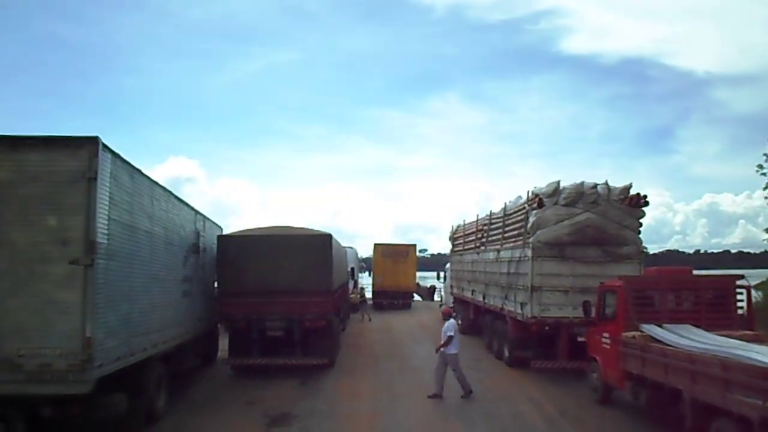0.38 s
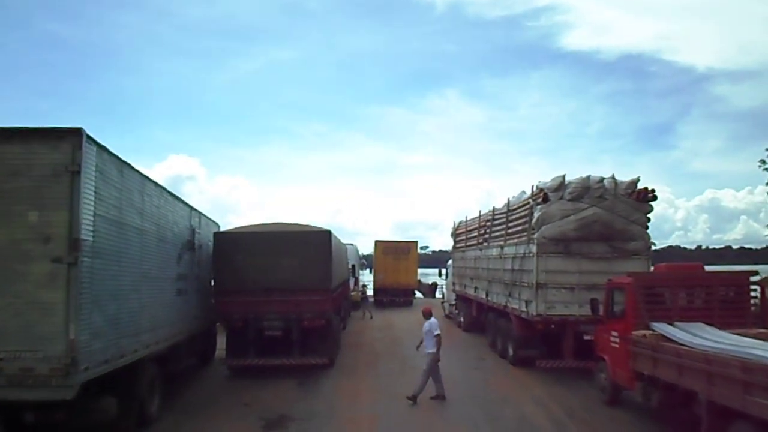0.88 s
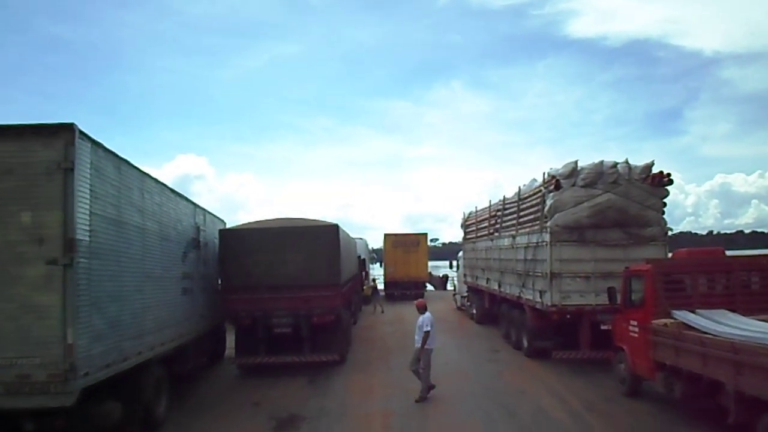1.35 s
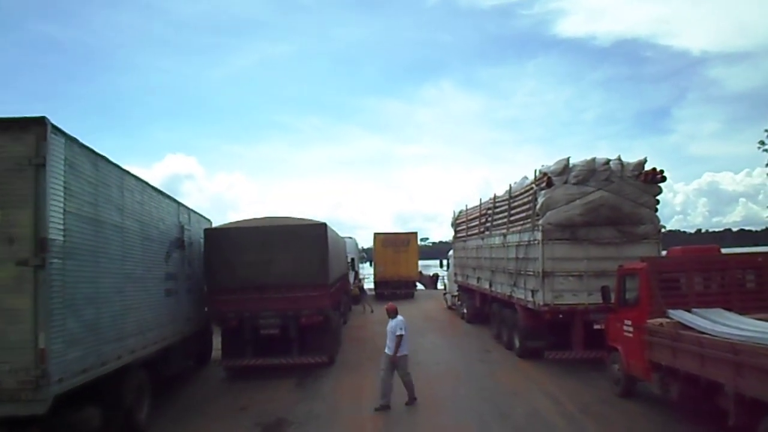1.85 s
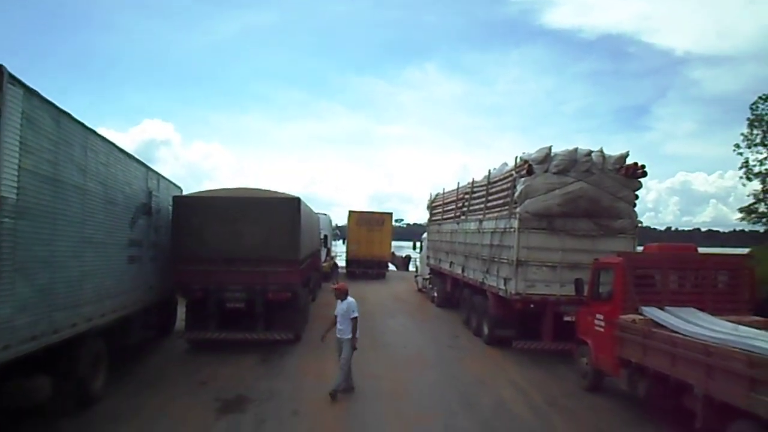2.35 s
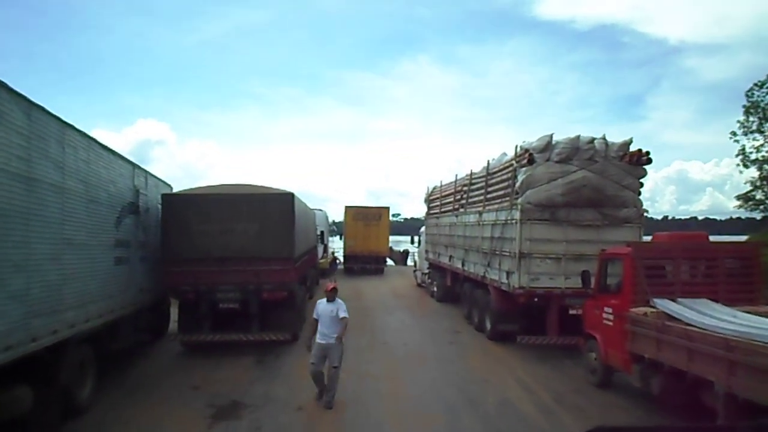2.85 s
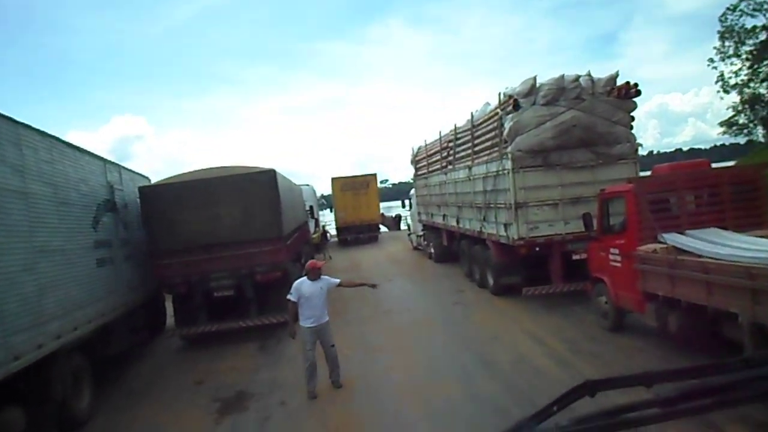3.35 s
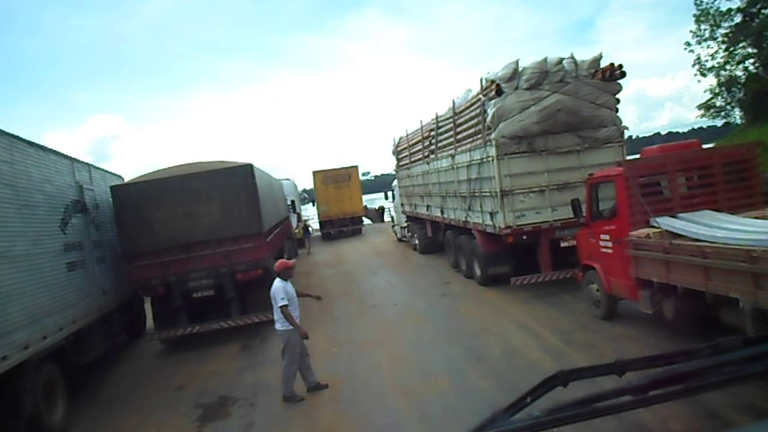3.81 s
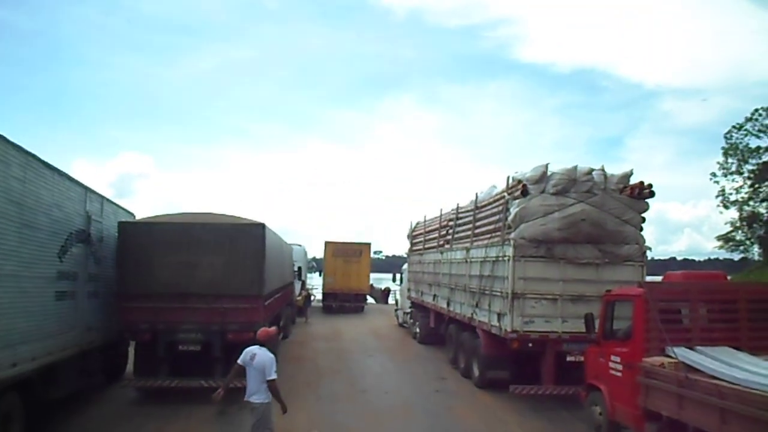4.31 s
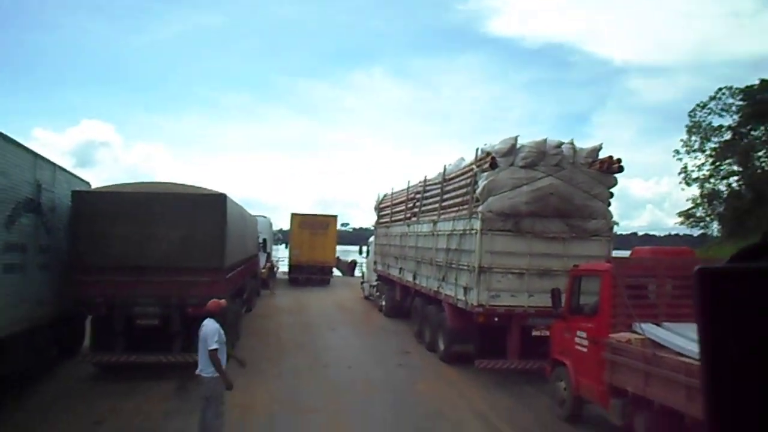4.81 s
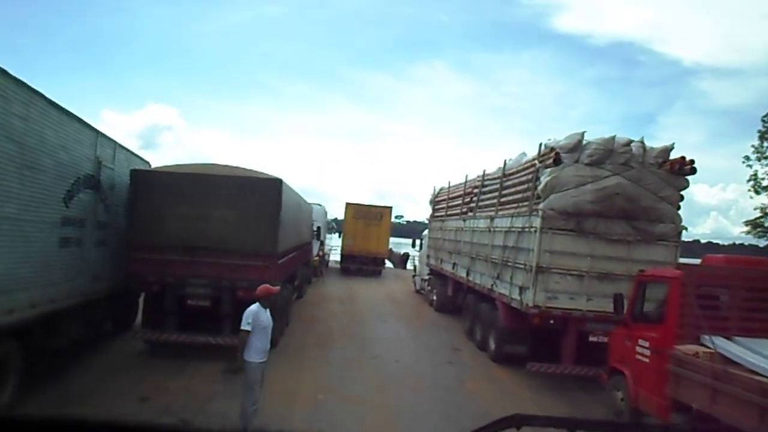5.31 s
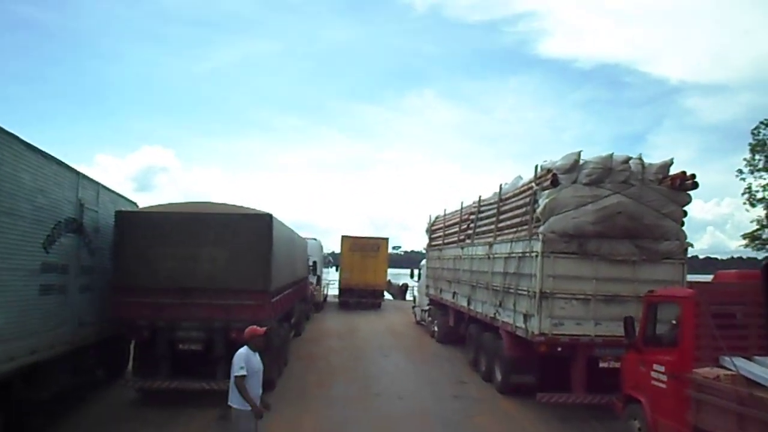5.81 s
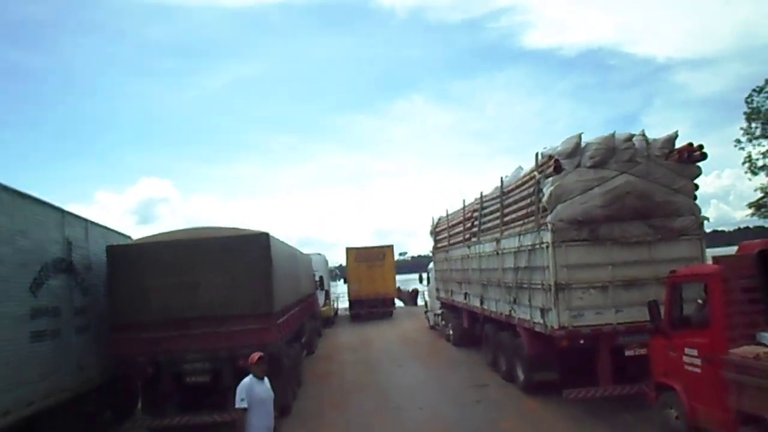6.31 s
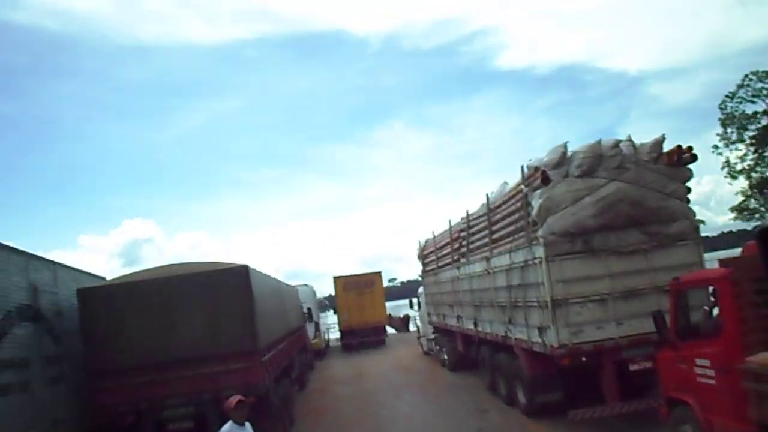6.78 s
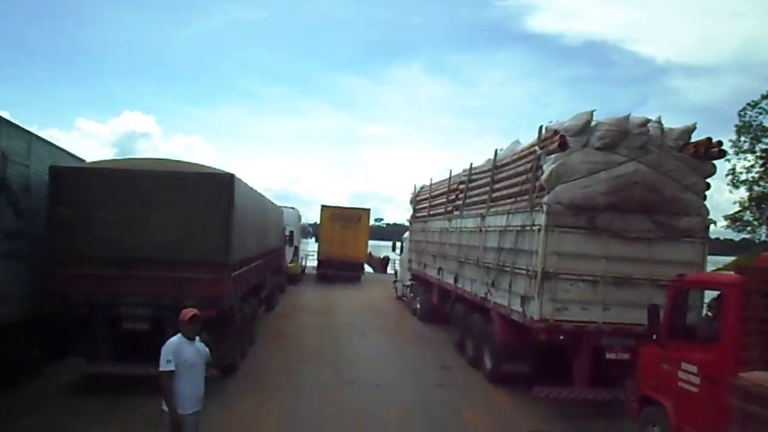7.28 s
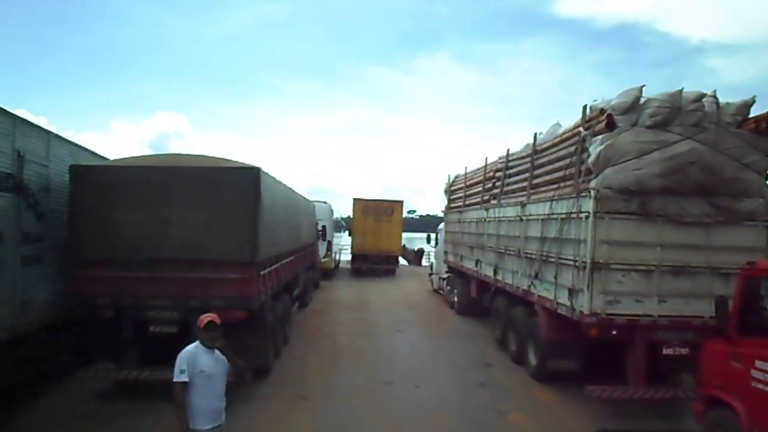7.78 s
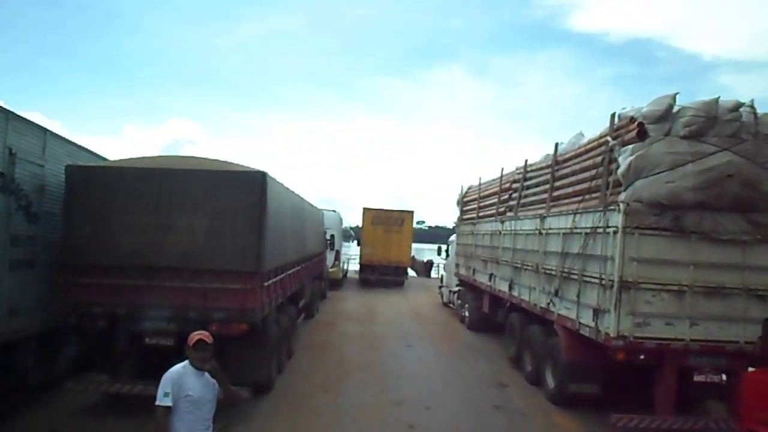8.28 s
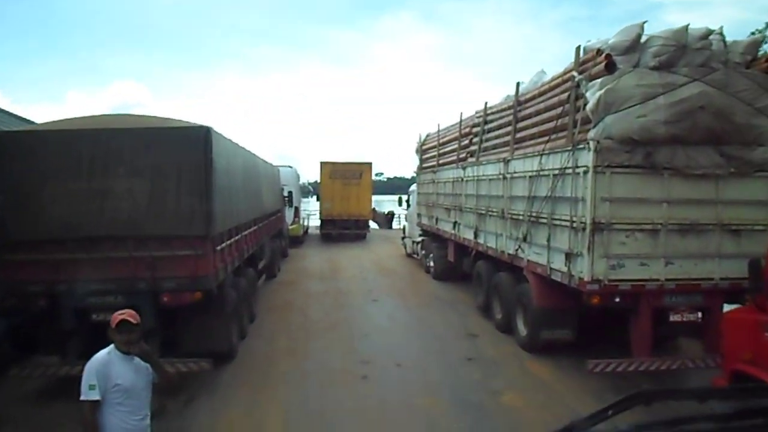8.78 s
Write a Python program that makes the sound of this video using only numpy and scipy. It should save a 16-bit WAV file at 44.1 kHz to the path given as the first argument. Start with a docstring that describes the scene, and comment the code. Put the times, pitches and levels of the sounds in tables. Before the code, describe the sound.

Heard from the driver's seat, a big diesel runs near idle, booming deeply with knock, clatter and a faint whine over rumble and soft air hiss. Faint squeaks lead to two quick, muffled brake-air puffs before three seconds. Later, scattered plastic ticks snap near the microphone, a dull bump lands, and a cluster of thumps shakes it near eight seconds, followed by one last tick and squeak.

```python
"""Inside a truck cab in a queue: a six-cylinder diesel near idle booms, knocks, whines and clatters throughout,
as tones and filtered noise tied to its firings, over rumble, air hiss and a neighbour's engine in steady tones.
Early on faint squeaks sound (narrow gliding noise), then the air brake puffs twice (noise in duct resonances).
From the middle on a plastic part near the microphone ticks now and then (short damped sines), and dull bumps
shake it (low noise bursts with ringing modes); one last squeak comes near the end."""
import sys
import numpy as np
from scipy import signal
from scipy.fft import rfft, irfft
from scipy.io import wavfile

SR = 44100
rng = np.random.default_rng(int(sys.argv[2]) if len(sys.argv) > 2 else 0)


def file_out(sig):
    """Save sig as 16-bit WAV at sys.argv[1]."""
    # one column per channel
    cols = np.atleast_2d(sig).T
    # limit, then scale
    lim = np.clip(cols, -1, 1)
    pcm = np.round(lim * 32767).astype(np.int16)
    wavfile.write(sys.argv[1], SR, pcm)


def gain_from_db(level_db):
    """Turn a decibel level (scalar or array-like) into a linear amplitude factor."""
    decades = np.asarray(level_db, float) / 20
    return 10 ** decades


N = 392049

# Engine load. Each row: time in seconds, clatter in dB, air hiss from outside in dB.
LOAD = [(0, -42, -50), (.5, -40.5, -51), (1.1, -38, -50), (2, -38.5, -50.5), (2.75, -38, -51),
        (3.44, -42, -54), (4.1, -40, -53), (4.3, -39.5, -49.5), (4.8, -38.5, -50), (5.37, -36.5, -50),
        (5.47, -40.5, -51.5), (6.1, -41, -52.5), (7.1, -40.5, -52), (7.5, -38, -48), (7.95, -36, -49),
        (8.15, -37, -48), (8.4, -33.5, -47), (8.89, -35.5, -44)]


def evened(x):
    """Scales to rms 1."""
    return x / np.sqrt(np.mean(x ** 2) + 1e-20)


def columns(rows, t):
    """Every column of a curve table, interpolated at the times t."""
    times_s, *rest = np.transpose(rows)
    return [np.interp(t, times_s, column) for column in rest]


def add(mix, start_s, sound):
    """Mixes a sound in at start_s."""
    part = mix[round(start_s * SR):][:len(sound)]
    part += sound[:len(part)]


def resonate(x, hz, width_hz):
    """One-pole resonance of gain 1: shifts hz (may glide) down to zero, smooths, shifts back."""
    turn = np.exp(2j * np.pi * np.cumsum(hz * np.ones(len(x))) / SR)
    pole = np.exp(-np.pi * width_hz / SR)
    smooth = signal.lfilter([1 - pole], [1, -pole], x / turn)
    return 2 * (turn * smooth).real


def ring(x, hz, width_hz):
    """Steep resonance: two equal stages of width_hz each, rms 1."""
    return evened(resonate(resonate(x, hz, width_hz), hz, width_hz))


def coloured(x, points):
    """Multiplies the spectrum of x by a curve of (Hz, dB) points, rms 1."""
    point_hz, point_db = np.transpose(points)
    hz = np.fft.rfftfreq(len(x), 1 / SR)
    curve_db = np.interp(np.log(hz + 1), np.log(point_hz + 1), point_db)
    return evened(irfft(rfft(x) * gain_from_db(curve_db), len(x)))


def drift(per_s):
    """Slow chance: per_s random points a second, smoothly joined, rms 1."""
    points = rng.standard_normal(int(N / SR * per_s) + 2)
    return evened(signal.resample(points, N))


def loaded(t, idle_db, load_share, pull_share, waver_db, per_s):
    """Level in dB that follows shares of the engine load and driveline pull, and wavers by chance."""
    # How hard the driveline pulls while creeping. Each row: time in seconds, pull in dB.
    pull = [(0, -1.5), (.3, -5.5), (.75, 3), (1.15, -0.5), (1.9, 0), (2.1, -4), (2.5, 4.5), (2.9, -0.5),
            (3.4, -11), (3.65, 5.5), (3.9, -4.5), (4.7, 3), (5.3, 4.5), (5.8, -5.5), (6.05, -7),
            (6.3, -6.5), (6.6, -4.5), (7.1, -6), (7.35, 2), (7.9, 8), (8.3, 2), (8.89, -4)]
    light_load_db = -40
    load_db = columns(LOAD, t)[0] - light_load_db
    pull_db = columns(pull, t)[0]
    return idle_db + load_share * load_db + pull_share * pull_db + waver_db * drift(per_s)


def rumble(t):
    """Low broadband noise that follows the engine load."""
    # Rumble spectrum. Each row: frequency in Hz, relative density in dB per Hz.
    spectrum = [(4, -21), (9, 4.5), (22, 10.5), (44, 2.5), (72, 6.5), (100, 3.5), (135, -2), (190, -5.5),
                (250, -6.5), (330, -15.5), (600, -28), (900, -69)]
    # Level: dB at light load, share of load, share of pull, wavering in dB rms.
    level = (-38.5, 0.85, -0.14, 0.8)
    noise = coloured(rng.standard_normal(N), spectrum)
    hz = np.fft.rfftfreq(N, 1 / SR)
    rms_above_95_hz = np.sqrt(2 * np.sum(abs(rfft(noise)[hz > 95]) ** 2)) / N
    return gain_from_db(loaded(t, *level, per_s=7.5)) * noise / rms_above_95_hz


def outside_hiss(t):
    """Air hiss from outside: coloured noise with a fast flutter in level."""
    # Hiss spectrum. Each row: frequency in Hz, relative density in dB per Hz.
    spectrum = [(1470, -5), (2500, -3.5), (3520, -6.5), (3860, -10.5), (5100, -10.5), (7470, -17),
                (8130, -17.5), (9870, -15.5), (11800, -35), (15300, -67), (22000, -120)]
    level_db = columns(LOAD, t)[1] + 1.02 * drift(per_s=40)
    return gain_from_db(level_db) * coloured(rng.standard_normal(N), spectrum)


def neighbour(t):
    """Engine alongside: tones of fixed pitch that swell and fade together."""
    # Drone tones. Each row: frequency in Hz, relative level in dB.
    tones = [(58.8, -9), (88.15, 0), (117.5, -14)]
    # Drone swell. Each row: time in seconds, gain in dB.
    swell = [(0, -44), (.35, -32), (.7, -32.5), (1.2, -32.5), (1.5, -44), (2, -31), (2.4, -36), (3, -32.5),
             (3.5, -36), (3.95, -33.5), (4.15, -27.5), (4.7, -32), (5.2, -28.5), (5.8, -29.5), (6, -41),
             (6.45, -45), (6.6, -27), (7, -32), (7.5, -38.5), (8.2, -33), (8.89, -35)]
    drone = sum(gain_from_db(db) * np.sqrt(2) * np.sin(2 * np.pi * hz * t) for hz, db in tones)
    return gain_from_db(columns(swell, t)[0]) * drone


def squeak(start_s, length_s, from_hz, to_hz, width_hz, level_db):
    """Faint, fuzzy metal whistle: noise in a narrow gliding resonance."""
    hz = np.linspace(from_hz, to_hz, round(length_s * SR))
    whistle = ring(rng.standard_normal(len(hz)), hz, width_hz)
    return start_s, gain_from_db(level_db) * whistle * signal.windows.tukey(len(hz), .5)


def puff(start_s, pipe_db, top_hz, hiss_db, rise_s, fall_s):
    """Escaping brake air: a pipe resonance sinks with the pressure through fixed duct modes; treble dies first."""
    # Treble hiss spectrum. Each row: frequency in Hz, relative density in dB per Hz.
    hiss_spectrum = [(1500, -26), (2600, 2), (4000, -2), (6000, -11), (9500, -13), (11000, -22),
                     (13000, -62)]
    # Brake duct resonances. Each row: frequency in Hz, width in Hz, gain in dB.
    duct = [(850, 120, -4), (1150, 90, -2), (1350, 110, 0), (1630, 80, 0), (1895, 70, -2), (2170, 80, -3),
            (2520, 80, -3)]
    sag_per_s, dull_db_per_s = 5, 110
    slow_rise_s = .045  # a faster rise starts with a jolt
    t = np.arange(0, rise_s + 3 * fall_s, 1 / SR)
    late_s = np.maximum(t - rise_s, 0)
    rise = np.sin(np.pi / 2 * np.minimum(t / rise_s, 1)) ** (rise_s / slow_rise_s)
    flow = rise * np.exp(-(late_s / fall_s) ** 1.4)
    hz = top_hz / (1 + sag_per_s * late_s)
    pipe = ring(rng.standard_normal(len(t)), hz, 1.3 * top_hz)
    pipe = evened(pipe + sum(gain_from_db(db) * resonate(pipe, f, w) for f, w, db in duct))
    hiss = coloured(rng.standard_normal(len(t)), hiss_spectrum)
    hiss *= gain_from_db(hiss_db - dull_db_per_s * late_s)
    return start_s, gain_from_db(pipe_db) * flow * (pipe + hiss)


def bump(start_s, level_db, t60_s, top_hz, ring_db):
    """Dull knock on the housing: low noise that rises in 6 ms and dies, and the housing's decaying modes."""
    # Housing modes. Each row: frequency in Hz, relative level in dB, 60 dB decay in seconds.
    housing = [(149, 3.5, 0.24), (270, 4, 0.22), (376, -7, 0.2), (482, -8, 0.31), (687, -1, 0.13),
               (795, -4.5, 0.11), (917, -2.5, 0.19), (1316, -11, 0.11)]
    t = np.arange(round(t60_s * SR)) / SR
    colour = [(20, -40), (70, -5), (130, 0), (240, -1.5), (top_hz, -9), (1.43 * top_hz, -26), (20000, -120)]
    thud = gain_from_db(-60 * t / t60_s) * coloured(rng.standard_normal(len(t)), colour)
    modes = 0
    for hz, db, mode_t60_s in housing:
        mode_hz = hz * rng.uniform(.975, 1.025)
        decay = gain_from_db(ring_db + db - 60 * t / mode_t60_s)
        modes = modes + decay * np.sin(2 * np.pi * (mode_hz * t + rng.random()))
    return start_s, gain_from_db(level_db) * np.minimum(t / .006, 1) * (thud + modes)


def tick(start_s, level_db, hz, after_db, top_db):
    """Plastic tick: a snap of a few cycles, short upper modes, and an after-ring damped at 5 ms."""
    # Upper modes. Each row: frequency in Hz, relative level in dB, 60 dB decay in seconds.
    upper_modes = [(2050, -2.5, 0.011), (2625, -2.5, 0.013), (4320, -5, 0.0081), (5170, 6, 0.0047),
                   (6390, -8.5, 0.009), (8260, 5, 0.0054), (9570, -2, 0.0065), (10230, -3, 0.005),
                   (11500, -5, 0.0025)]
    middle_db = -5.5 - .25 * after_db  # less ringing spreads more into the middle modes
    snap_s = .0012
    t = np.arange(700) / SR
    tone = np.sin(2 * np.pi * hz * t)
    snap = np.exp(-((t - snap_s) / .00048) ** 2) * tone
    held = np.clip((t - snap_s) / .0012, 0, 1) * gain_from_db(-60 * t / .04)
    after = held / (1 + (t / .005) ** 12) * tone
    upper = 0
    for mode_hz, db, t60_s in upper_modes:
        group_db = top_db if mode_hz > 7500 else middle_db
        decay = gain_from_db(group_db + db - 60 * t / t60_s)
        upper = upper + decay * np.sin(2 * np.pi * (mode_hz * t + rng.random()))
    upper = upper * np.clip((t - .0002) / .0009, 0, 1) ** 2
    return start_s, gain_from_db(level_db) * (snap + gain_from_db(after_db) * after + upper)


def dips(t):
    """Gain of the brief boom cancellations, probably against the engine alongside: a V-shaped notch each."""
    # Each row: time in seconds, depth in dB.
    rows = [(.65, -6.5), (2.45, -8.5), (3.29, -19), (3.51, -27), (3.99, -5.5), (5.05, -5), (7.13, -8.5),
            (7.32, -9.5), (7.61, -18), (7.98, -27), (8.37, -23)]
    half_width_s = .075
    gain = np.ones(len(t))
    for s, db in rows:
        distance = (t - s) ** 2
        gain *= np.sqrt((distance + (half_width_s * gain_from_db(db)) ** 2) / (distance + half_width_s ** 2))
    return gain


def engine_tones(t, speed_hz, turns):
    """Multiples of the firing rate: cab boom, rocking on the mounts at half rate, and weaker orders."""
    # Each row: time in seconds, boom at the firing rate in dB, rocking in dB.
    boom = [(0, -16, -28), (.5, -15, -23), (1, -18.5, -34), (1.25, -13, -28), (1.65, -18.5, -35),
            (1.85, -14, -29), (2.2, -13.5, -30), (2.6, -15, -31), (2.9, -11.5, -34), (3.05, -14.5, -28),
            (3.25, -23.5, -28.5), (3.7, -23.5, -21.5), (4.1, -21.5, -25), (4.22, -16, -30), (4.6, -18, -21),
            (4.7, -25.5, -28), (5.15, -22.5, -24), (5.35, -15, -34), (5.55, -15.5, -32), (5.85, -13, -28),
            (6.35, -17, -20), (6.9, -11.5, -35), (7.2, -13, -20.5), (7.8, -19, -30), (8.3, -17, -22),
            (8.7, -14.5, -25), (8.89, -21, -26)]
    # Orders that come up when the engine lugs. Each row: multiple, level in dB at the slowest speed.
    lugging = [(3, -32.5), (6, -34.5)]
    # Weaker tones. Each row: multiple of the firing rate, level in dB.
    orders = [(.72, -40), (1.5, -39), (1.67, -39), (2.17, -41), (3.83, -45), (5.5, -44), (7, -47.5),
              (8, -55)]
    slowest_hz, lug_db_per_hz = 27.97, -9
    boom_share, usual_boom_db = .41, -17.5  # the second multiple follows part of the boom

    def tone(multiple, db):
        return np.sqrt(2) * gain_from_db(db) * np.sin(2 * np.pi * (multiple * turns + rng.random()))

    boom_db, rocking_db = columns(boom, t)
    tones = dips(t) * tone(1, boom_db) + tone(.5, rocking_db + 2.8 * drift(per_s=6))
    second_db = loaded(t, idle_db=-30, load_share=-.44, pull_share=.67, waver_db=3, per_s=6)
    tones += tone(2, second_db + boom_share * (boom_db - usual_boom_db))
    for multiple, db in lugging:
        lug_db = db + lug_db_per_hz * (speed_hz - slowest_hz)
        tones += tone(round(multiple), lug_db + 3.3 * drift(per_s=2.5))
    for multiple, db in orders:
        tones += tone(multiple, db + 3 * drift(per_s=2.4))
    return tones


def cab_air(t, firing, pulses):
    """Thud of each firing in the cab air: pulses and noise through one low resonance."""
    banks = .5 + (-1.) ** firing  # alternate cylinders reach the cab in opposite phase
    thuds = ring(banks * pulses + 1.36 * rng.standard_normal(N), hz=161, width_hz=24)
    level_db = loaded(t, idle_db=-36.5, load_share=-.1, pull_share=.63, waver_db=.9, per_s=4)
    return gain_from_db(level_db) * thuds


def block_knock(t, pulses):
    """Combustion blows and a steady rattle ring the engine block."""
    # Each row: time in seconds, level in dB, rattle as a factor re blows.
    curve = [(0, -47.5, .3), (1.2, -43, 0.34), (2, -46, 0.27), (2.6, -46, 0.64), (2.9, -49.5, .7),
             (4.1, -52, 0.97), (5.2, -45.5, .7), (6.2, -47, 0.76), (6.7, -49, 0.97), (7.4, -44.5, .7),
             (8.15, -43, 1), (8.3, -55, .9), (8.89, -41.5, .9)]
    level_db, rattle = columns(curve, t)
    blows = pulses * rng.choice([-1, 1], N)  # each meets the ringing block at a chance phase
    block_hz = 958
    block = resonate(blows + rattle * rng.standard_normal(N), block_hz, 30)
    return gain_from_db(level_db) * evened(resonate(block, block_hz, 90))


def gear_whine(t, burn):
    """Gear whine: noise, stronger at each firing, in a narrow resonance that wanders with the mesh."""
    # Each row: time in seconds, level in dB.
    curve = [(0, -62), (1.5, -52.5), (2.6, -51.5), (3.5, -61), (4.6, -50.5), (4.98, -55), (5.06, -41.5),
             (5.38, -44.5), (5.5, -48), (6.4, -53.5), (6.9, -50.5), (7.6, -57), (8.5, -46), (8.89, -45.5)]
    whine = ring((2.5 + burn) * rng.standard_normal(N), hz=1180 + 4 * drift(per_s=3), width_hz=23)
    return gain_from_db(columns(curve, t)[0]) * whine


def clatter(t, burn):
    """Clatter behind the firewall: coloured noise, slightly stronger at each firing, and ringing panels."""
    # Clatter spectrum. Each row: frequency in Hz, relative density in dB per Hz.
    spectrum = [(210, -18), (350, -5), (824, 1), (974, 0), (1020, 1), (1220, -1), (1860, -8.5), (2740, -12),
                (3870, -31), (5000, -33), (6500, -49), (11000, -120)]
    # Panels. Each row: frequency in Hz, width of each stage in Hz, relative level in dB.
    panels = [(420, 37, -18.5), (482.6, 5.7, -19.5), (1619, 130, -23), (2766, 110, -37.5), (3794, 490, -28),
              (5400, 880, -30.5)]
    shake = (20 + burn) * rng.standard_normal(N)
    sound = gain_from_db(-2) * coloured(shake, spectrum)
    sound += sum(gain_from_db(db) * ring(shake, hz, width_hz) for hz, width_hz, db in panels)
    return gain_from_db(columns(LOAD, t)[0] + .5 * drift(per_s=8)) * sound


def engine(t):
    """Six-cylinder diesel: one firing clock drives its tones, thuds, knock, whine and clatter."""
    # Each row: time in seconds, firings per second.
    speed = [(0, 30.4), (.6, 31.4), (1, 30.8), (1.4, 29.65), (2.05, 29.35), (2.3, 28.35), (2.5, 28.2),
             (3.05, 31.1), (3.4, 32.8), (3.65, 31.8), (4, 30.6), (4.85, 29.5), (5.15, 28.3), (5.35, 28.3),
             (5.85, 28.7), (6.3, 29.6), (6.65, 30.1), (7.15, 30.5), (7.6, 32), (8.1, 31.7), (8.35, 30.9),
             (8.89, 30.5)]
    # Mean strength of each cylinder in dB, in firing order.
    cylinder_db = [-10, 0, -6, -11, -7, -1.5]
    speed_hz = columns(speed, t)[0]
    turns = .4 + np.cumsum(speed_hz) / SR  # in firings; starts partway through one
    firing = turns.astype(int)
    chance_db = rng.standard_normal(firing[-1] + 1)[firing]
    strength = gain_from_db(np.take(cylinder_db, firing, mode="wrap") + chance_db)
    pulses = evened(strength * np.diff(firing, prepend=0))
    burn = evened(strength * np.exp(-(turns % 1) / .15))  # pressure falls fast after each firing
    low = engine_tones(t, speed_hz, turns) + cab_air(t, firing, pulses)
    return low + block_knock(t, pulses) + gear_whine(t, burn) + clatter(t, burn)


def scene():
    """All sources at the driver's seat."""
    # Each row: start in seconds, length in seconds, start Hz, end Hz, width of each stage in Hz, level in dB.
    squeaks = [(1.035, .05, 7900, 7900, 350, -64), (1.235, .055, 7900, 7900, 350, -64),
               (2.3, .32, 3980, 4040, 260, -60), (2.535, .095, 3630, 3750, 30, -53.5),
               (8.63, .035, 3500, 3520, 90, -48)]
    # Each row: start in seconds, pipe in dB, first centre in Hz, treble hiss in dB re pipe, rise and fall in s.
    puffs = [(2.732, -31.5, 1900, -13, .036, .08), (2.935, -33.5, 1600, -24, .065, .085)]
    # Each row: start in seconds, level in dB, 60 dB decay in seconds, top of the thud in Hz, housing ring in dB.
    bumps = [(5.764, -26, 0.46, 584, -16), (5.78, -23.5, 0.63, 265, -19), (7.775, -23.5, 0.33, 300, -12),
             (7.85, -18.5, 0.13, 900, -3), (7.893, -23, 0.81, 446, -10), (7.925, -26, 0.26, 600, -8),
             (7.96, -30, 0.41, 560, -8), (8.008, -31.5, 0.2, 950, 4.5), (8.05, -29, 0.96, 400, -2.5),
             (8.113, -28, 0.86, 380, -13)]
    # Ticks and rebounds. Each row: start in s, level in dB, main ring in Hz, after-ring in dB, top modes in dB.
    ticks = [(4.8862, -31.5, 2250, -15, -15), (4.888, -34.5, 3150, -1, -21), (5.286, -19, 3600, -20, -7.5),
             (5.2886, -30, 3260, -6, -25), (6.4569, -12, 3470, -4.5, -5), (7.089, -38, 2870, -8, -13),
             (7.3848, -16.5, 3520, -4, -19), (7.88, -23.5, 3350, -18, -8.5), (7.8814, -36, 3350, -12, -20),
             (8.568, -18.5, 3360, -20, -2.5)]
    t = np.arange(N) / SR
    mix = rumble(t) + outside_hiss(t) + neighbour(t) + engine(t)
    for source, rows in ((squeak, squeaks), (puff, puffs), (bump, bumps), (tick, ticks)):
        for row in rows:
            add(mix, *source(*row))
    return mix[None]


def band_limit(x):
    """A steep low-pass at the top of the band."""
    return signal.sosfilt(signal.butter(12, 11910, fs=SR, output="sos"), x)


def record(dry):
    """The microphone rounds off the highest peaks; a low-pass then limits the band."""
    ceiling = .88
    rounded = ceiling * np.tanh(dry / ceiling)
    low_pass = signal.firwin(401, 12150, fs=SR)[None]
    limited = signal.oaconvolve(rounded, low_pass, "same")
    return band_limit(limited)


dry = scene()
out = record(dry)
file_out(out)
```